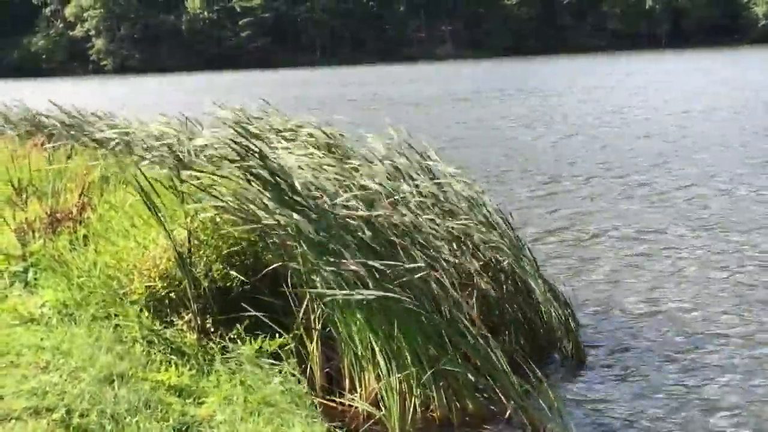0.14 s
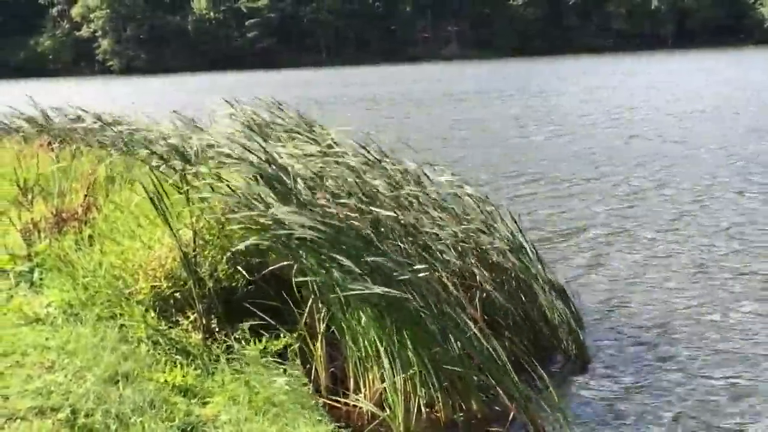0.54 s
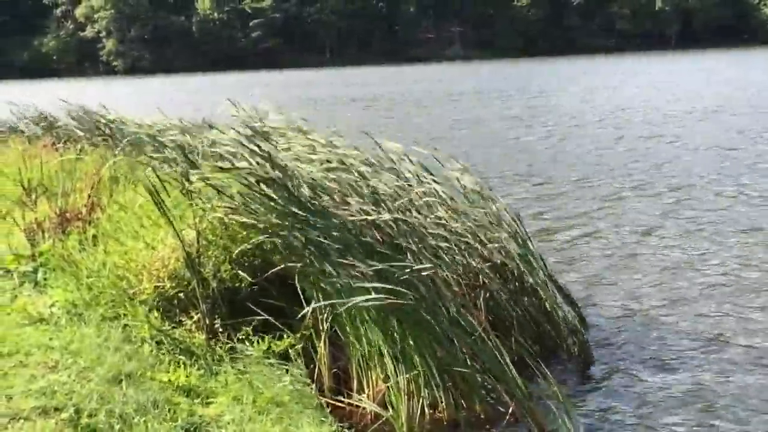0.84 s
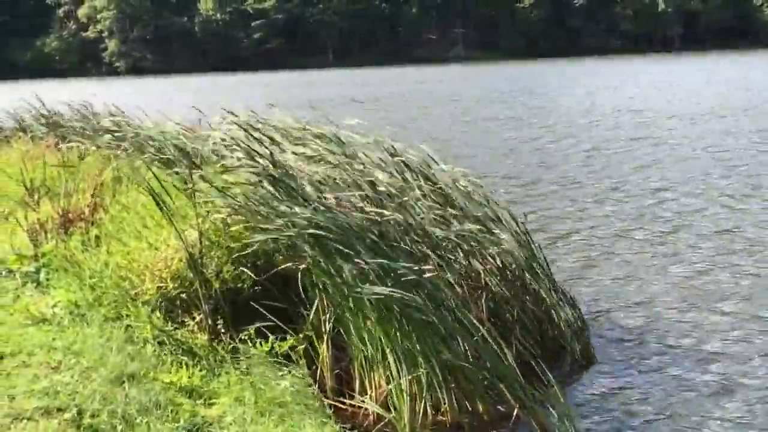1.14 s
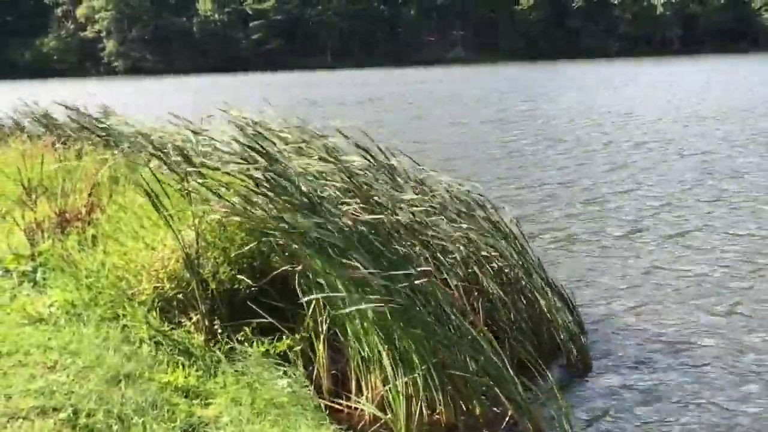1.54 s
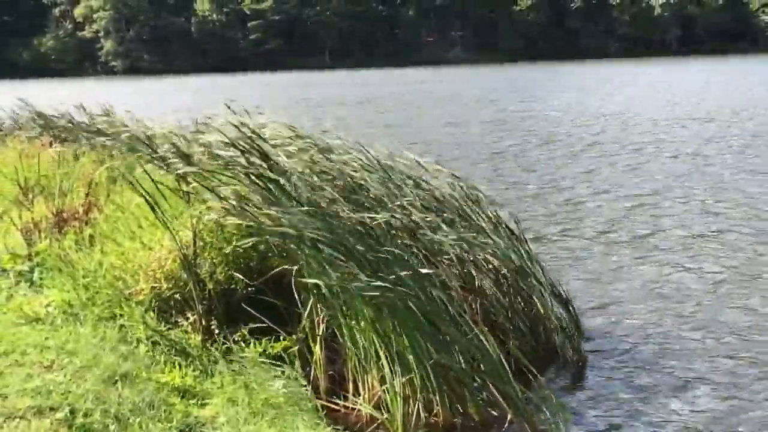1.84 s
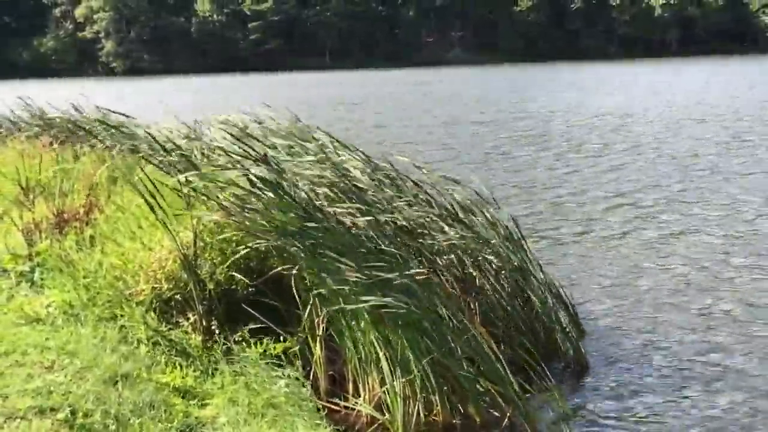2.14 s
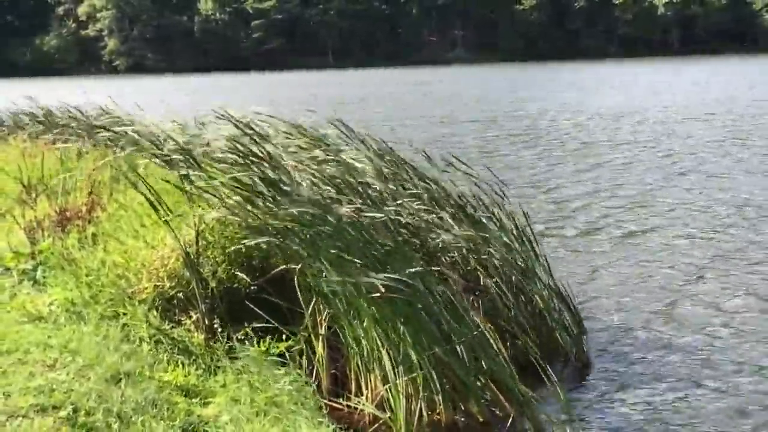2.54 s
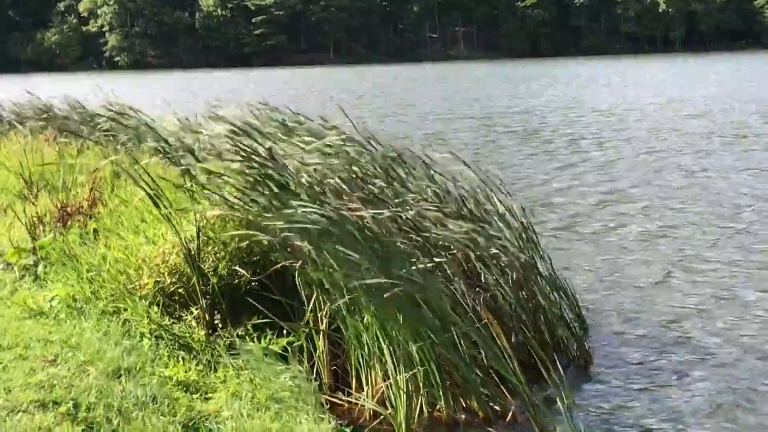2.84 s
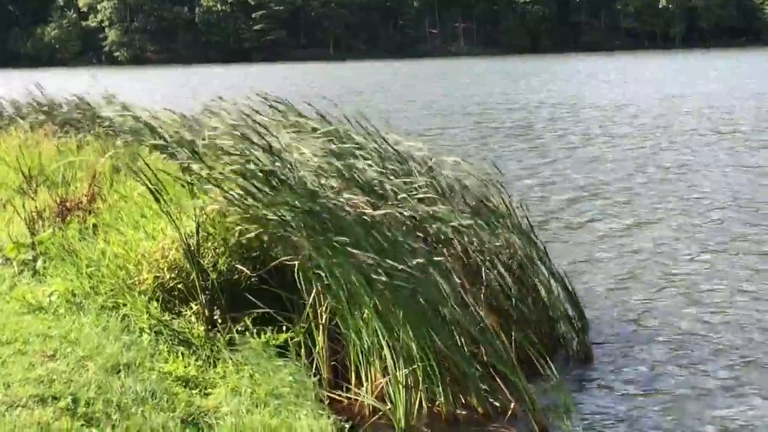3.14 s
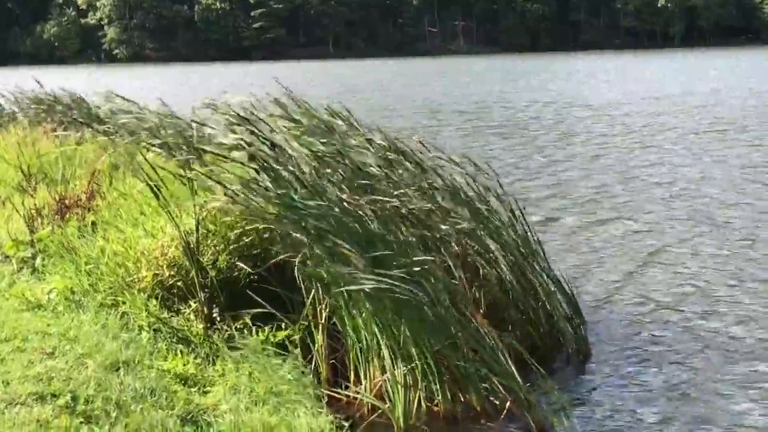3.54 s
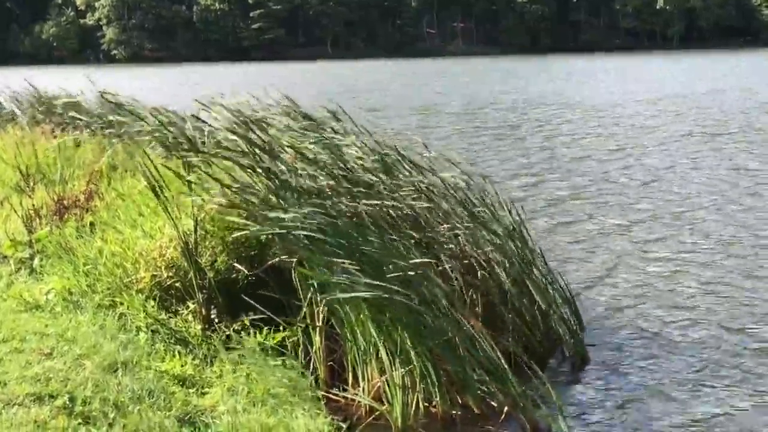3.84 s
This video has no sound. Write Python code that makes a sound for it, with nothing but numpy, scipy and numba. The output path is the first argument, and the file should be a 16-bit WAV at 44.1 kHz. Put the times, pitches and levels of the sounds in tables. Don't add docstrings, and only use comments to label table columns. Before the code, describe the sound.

Wind buffets an unshielded microphone at a lakeside: low rumble and ragged thumps crowd 0.4-1.4 s, with the hardest bump near 0.63 s. Further bumps land at 1.9 and 2.26 s, then the wind sinks to a faint rumble, stirring again after 3.8 s. Reeds, trees and water hiss softly and evenly throughout. A very high, faint katydid buzz pulses quickly, slows and stops around 3.3 s, leaving a few tiny ticks.

```python
import sys
import numpy as np
from scipy import signal
from scipy.fft import rfft, irfft
from scipy.io import wavfile
from scipy.ndimage import uniform_filter1d
from numba import njit

SR = 44100
rng = np.random.default_rng(int(sys.argv[2]) if len(sys.argv) > 2 else 0)


def boost_factor(decibels):
    exponent = np.asarray(decibels, float) / 20
    return 10 ** exponent


def wav_record(signal):
    frames = np.transpose(np.atleast_2d(signal))
    bounded = np.clip(frames, -1, 1)
    quanta = np.round(bounded * 32767).astype(np.int16)
    wavfile.write(sys.argv[1], SR, quanta)


N = 176400


def pulse(t, hz):
    u = (np.pi * hz * t) ** 2
    return (1 - 2 * u) * np.exp(-u)


def eddies(table, wander, trim_db, count):
    ripple_db, ripple_ratio = -15.5, 2.37
    peak_share = 0.7
    half = SR // 10
    t = (np.arange(SR // 5) - half)[:, None] / SR
    out = np.zeros(N + SR)
    place = np.linspace(-0.5, 0.5, count)
    for at_s, db, length_s, swing_hz in table:
        jitter, bluntness, sign, uneven = rng.standard_normal((4, count))
        since = t - length_s * (place + jitter / count / 3)
        pulse_hz = peak_share * swing_hz * np.exp(wander * np.tanh(bluntness))
        ripple = pulse(since - uneven / swing_hz / 4, ripple_ratio * pulse_hz)
        shape = pulse(since, pulse_hz) + boost_factor(ripple_db) * ripple
        swing = shape @ (np.sign(sign) * boost_factor(1.5 * uneven - 14 * place ** 2))
        level = boost_factor(db + trim_db) * np.sqrt(length_s * SR / np.sum(swing ** 2))
        start = int(at_s * SR)
        out[start:start + len(t)] += level * swing
    return out[half:half + N]


# (centre [s], level [dB], length [s], swing [Hz])
SLOW_EDDIES = [(0.433, -33.5, 0.044, 76.4), (0.512, -32, 0.057, 65.5), (0.654, -31, 0.056, 96),
               (0.754, -28.5, 0.033, 85), (0.801, -32, 0.031, 75), (0.899, -34, 0.0683, 87),
               (0.99, -32.5, 0.051, 81.5), (1.073, -49, 0.037, 75), (1.127, -34.5, 0.05, 76.6),
               (1.305, -32, 0.081, 68.7), (1.37, -37.5, 0.13, 73), (1.577, -35.5, 0.036, 91),
               (1.738, -42.5, 0.061, 74.5), (1.902, -27.5, 0.033, 110), (2.269, -39.5, 0.027, 102),
               (2.337, -45, 0.097, 79), (2.486, -42.5, 0.032, 60), (2.604, -43, 0.048, 98),
               (2.752, -45, 0.07, 95), (2.925, -47.5, 0.11, 72), (3.042, -46, 0.095, 69),
               (3.267, -47.5, 0.032, 88), (3.396, -49.5, 0.088, 85), (3.443, -50.5, 0.025, 83.5),
               (3.537, -47.5, 0.05, 80), (3.627, -52.5, 0.042, 88), (3.705, -53, 0.059, 100),
               (3.774, -48.5, 0.021, 65), (3.842, -40, 0.055, 86), (3.968, -44, 0.078, 77.4)]


def thumps():
    lead_s = 0.006
    return np.roll(eddies(SLOW_EDDIES, wander=0.25, trim_db=4.6, count=5), -int(lead_s * SR))


# (centre [s], level [dB], length [s], swing [Hz])
FAST_EDDIES = [(0.091, -36.5, 0.019, 200.0), (0.439, -33.5, 0.015, 240.0), (0.51, -36.5, 0.04, 190.0),
               (0.635, -16.5, 0.0068, 280.0), (0.759, -34, 0.053, 180.0), (0.797, -29.5, 0.0072, 240.0),
               (0.871, -43, 0.029, 190.0), (0.934, -26, 0.014, 280.0), (0.979, -26.5, 0.019, 210.0),
               (1.043, -41.5, 0.037, 220.0), (1.102, -33, 0.014, 210.0), (1.216, -37.5, 0.012, 270.0),
               (1.264, -34, 0.017, 190.0), (1.298, -39.0, 0.045, 240.0), (1.417, -42.5, 0.039, 210.0),
               (1.558, -41, 0.03, 200.0), (1.723, -39, 0.022, 190.0), (1.781, -44.5, 0.01, 230.0),
               (1.898, -26, 0.013, 220.0), (2.26, -26.5, 0.011, 190.0), (2.592, -42.5, 0.032, 190.0),
               (2.753, -39.5, 0.021, 210.0), (2.915, -46.5, 0.022, 210.0), (3.31, -45.5, 0.015, 240.0),
               (3.436, -55, 0.016, 260.0), (3.511, -58.5, 0.02, 240.0), (3.547, -48.5, 0.022, 200.0),
               (3.735, -57, 0.036, 220.0), (3.856, -37, 0.022, 250.0), (3.966, -53, 0.03, 230.0)]
# (centre [s], level [dB], length [s], swing [Hz])
MORE_FAST_EDDIES = [
    (.655, -34.5, 0.025, 264),
    (2.03, -46, 0.027, 162),
    (2.783, -40.5, 0.016, 215),
    (3.824, -42.5, 0.013, 290),
    (.35, -40, 0.0296, 200),
    (.905, -39, 0.019, 240),
]


def bumps():
    main = eddies(FAST_EDDIES, wander=0.17, trim_db=-0.3, count=3)
    return main + eddies(MORE_FAST_EDDIES, wander=0.17, trim_db=-0.3, count=3)


def unit(x):
    return x / np.sqrt(np.mean(x ** 2))


def curve(table):
    return np.interp(np.arange(N) / SR, *np.array(table).T[:2])


def walk(rate_hz):
    hold = int(SR / rate_hz)
    steps = np.repeat(rng.standard_normal(N // hold + 1), hold)
    return 1.3 * uniform_filter1d(uniform_filter1d(steps, hold), hold)[:N]


def bands(colour, centres_hz, shared_db, own_db, own_rate_hz, x):
    f = np.fft.rfftfreq(N, 1 / SR) + 1
    hz, db = np.array(colour).T
    tinted = rfft(x) * boost_factor(np.interp(np.log(f), np.log(hz), db, left=-80))
    out = 0
    for centre in centres_hz:
        share = np.cos(np.clip(2 * np.log2(f / centre), -1, 1) * np.pi / 2) ** 2
        out = out + irfft(tinted * share, N) * boost_factor(shared_db + own_db * walk(own_rate_hz))
    return unit(out)


# (time [s], level [dB])
GUST_LEVEL = [(0.0, -44), (0.1, -46), (0.52, -46), (0.75, -51.5), (0.95, -44.5), (1.49, -52), (1.89, -54),
              (1.97, -56), (2.86, -55), (3.09, -61), (3.71, -61.5), (3.89, -57), (4.0, -47.5)]
# (frequency [Hz], density [dB per Hz])
RUMBLE_COLOUR = [(25, -15), (40, -3), (60, 4.3), (100, -4), (160, -9.5), (250, -20), (400, -41), (700, -61)]


def rumble():
    puffs_per_s, spread_db, steady_db, trim_db = 140, 2.0, -6, 10
    hits = rng.random(N) < puffs_per_s / SR
    puffs = hits * rng.standard_normal(N) * boost_factor(spread_db * rng.exponential(size=N))
    turbulence = unit(puffs) + boost_factor(steady_db) * rng.standard_normal(N)
    centres_hz = 16 * 2 ** np.arange(0, 6, 0.5)
    noise = bands(RUMBLE_COLOUR, centres_hz, 2.0 * walk(25), 1.8, 14, turbulence)
    return noise * boost_factor(curve(GUST_LEVEL) + trim_db)


@njit
def svf(x, hz, width):
    y, b, l = np.empty(len(x)), 0., 0.
    g, k = np.tan(np.pi * hz / SR), width / hz
    for i in range(len(x)):
        v = (b + g * (x[i] - l)) / (1 + g * (g + k))
        b, l, y[i] = 2 * v - b, l + 2 * g * v, k * v
    return y


# (frequency [Hz], density [dB per Hz])
HISS_COLOUR = [(200, -7), (500, -2.5), (1040, -2), (2100, -8), (3260, -10), (6500, -17), (9300, -20),
               (16000, -26)]
# (time [s], level [dB])
HISS_LEVEL = [(0.0, -54.5), (0.01, -61), (0.83, -62.5), (2.29, -61), (3.99, -62), (4.0, -60)]
# (centre [Hz], width [Hz], depth [0-1])
REFLECTION_DIPS = [(4940, 330, 0.38), (7700, 1100, 0.37), (10530, 940, 0.55)]


def reeds():
    ticks_per_s, tick_db, spread_db, trim_db = 1100, -11.5, -0.5, 3.5
    swell_db, flicker_db = 0.27, 0.69
    hits = (rng.random(N) < ticks_per_s / SR) * boost_factor(spread_db * rng.exponential(size=N))
    leaves = rng.standard_normal(N) + boost_factor(tick_db) * unit(hits * rng.standard_normal(N))
    centres_hz = 2 ** np.arange(7, 14.6, 0.5)
    hiss = bands(HISS_COLOUR, centres_hz, swell_db * walk(3), flicker_db, 12, leaves)
    for hz, width_hz, depth in REFLECTION_DIPS:
        hiss = hiss - depth * svf(hiss, 1. * hz, 1. * width_hz)
    return hiss * boost_factor(curve(HISS_LEVEL) + trim_db)


# (time [s], level [dB])
BUZZ_LEVEL = [(0.0, -74), (0.01, -82), (0.14, -73), (0.82, -77), (0.87, -72), (1.37, -79), (1.52, -71),
              (1.61, -74.5), (3.21, -71.5), (3.3, -73)]
# (time [s], peak level [dB])
LONE_TICKS = [
    (3.3783, -53),
    (3.493, -61),
    (3.5499, -57),
    (3.6207, -64),
    (3.8886, -54),
]
# (centre [Hz], width [Hz], level [dB])
WING_MODES = [(15200, 3400, 0.1), (12900, 2600, -10)]


def wing_strokes(t):
    rate_hz, sag_hz_per_s, tires_s, tire_hz_per_s = 36.6, 0.27, 3.1, 20
    rise, fall, gap_db, spread_db = 0.44, 0.15, -9, 1.5
    cycles = rate_hz * t + 0.88 - sag_hz_per_s * t ** 2 / 2
    cycles = cycles - tire_hz_per_s * np.clip(t - tires_s, 0, None) ** 2 / 2
    phase = cycles % 1 - 0.6
    reach = np.where(phase < 0, phase / rise, phase / fall)
    stroke = np.cos(np.clip(reach, -1, 1) * np.pi / 2)
    size = boost_factor(spread_db * rng.standard_normal(400))[cycles.astype(int)]
    return stroke * size + boost_factor(gap_db)


def wing_ring(x, flutter):
    flutter_db = 1.2
    out = 0
    for k, (hz, width_hz, db) in enumerate(WING_MODES):
        mode = svf(svf(x, 1. * hz, 1. * width_hz), 1. * hz, 1.4 * width_hz)
        out = out + (-1) ** k * boost_factor(db + flutter_db * flutter[k]) * mode
    return out


def katydid():
    tooth_hz, tooth_blur = 750, 0.5
    stops_s, buzz_trim_db, tick_s, tick_trim_db = 3.338, 3.2, 0.0015, -8
    t = np.arange(N) / SR
    strokes = wing_strokes(t)
    tooth_phase = 2 * np.pi * np.cumsum(tooth_hz * np.exp(0.39 * walk(130))) / SR
    teeth = (0.5 + 0.5 * np.cos(tooth_phase)) ** 2
    buzz = unit(strokes * (teeth + tooth_blur))
    drive = buzz * boost_factor(curve(BUZZ_LEVEL) + buzz_trim_db) * (t < stops_s)
    for at_s, db in LONE_TICKS:
        drive = drive + boost_factor(db + tick_trim_db) * (t >= at_s) * np.exp(-np.abs(t - at_s) / tick_s)
    noise = rng.standard_normal(N)
    flutter = [walk(29.5) for _ in WING_MODES]
    return wing_ring(drive * noise, flutter) / np.std(wing_ring(noise, flutter))


def scene():
    return (thumps() + bumps() + rumble() + reeds() + katydid())[None]


def top_cut(x):
    return signal.sosfilt(signal.butter(12, 16760, fs=SR, output="sos"), x)


def record(dry):
    mic_low_hz, top_hz = 43, 15730
    x = signal.sosfilt(signal.butter(4, mic_low_hz, "high", fs=SR, output="sos"), dry)
    x = signal.sosfilt(signal.ellip(12, 0.2, 60, top_hz, fs=SR, output="sos"), x)
    return top_cut(x)


dry = scene()
out = record(dry)
wav_record(out)
```